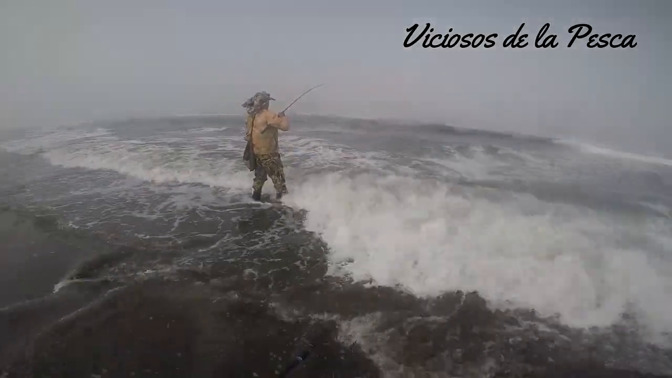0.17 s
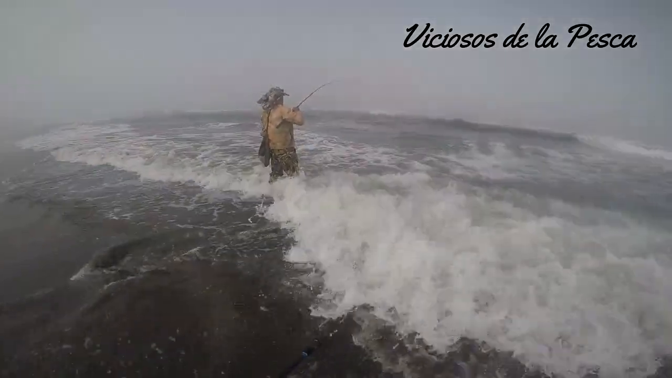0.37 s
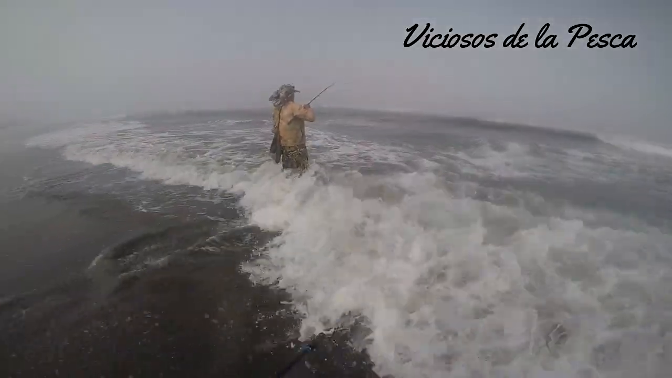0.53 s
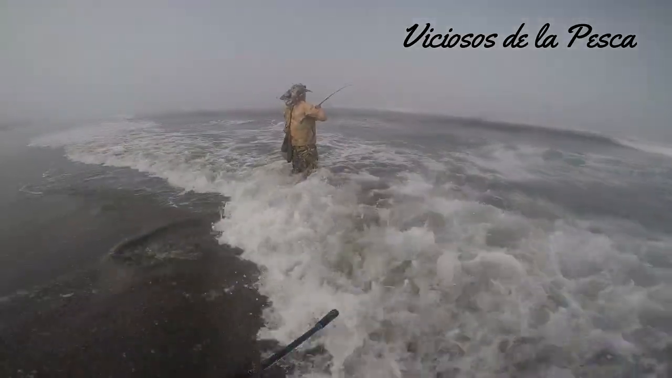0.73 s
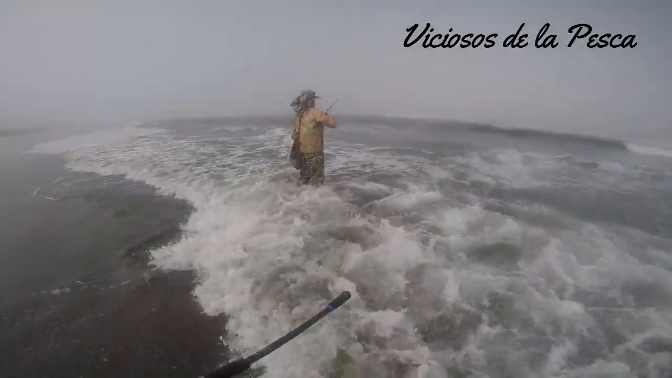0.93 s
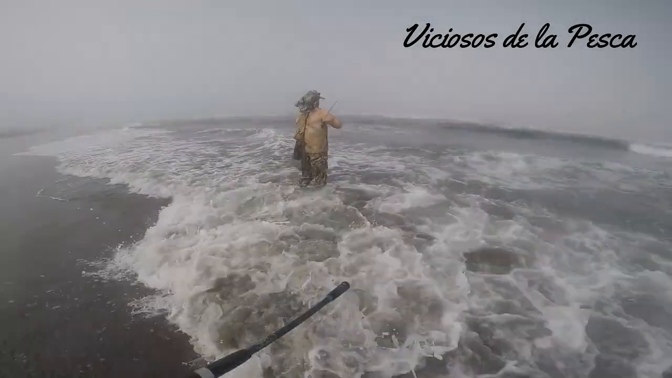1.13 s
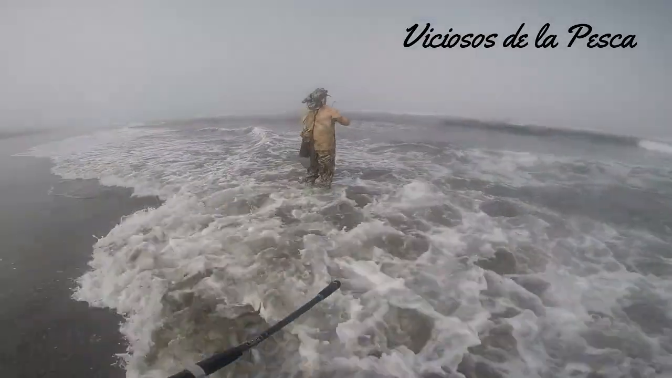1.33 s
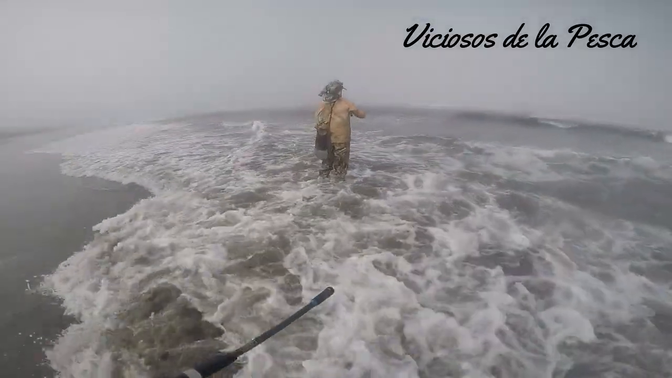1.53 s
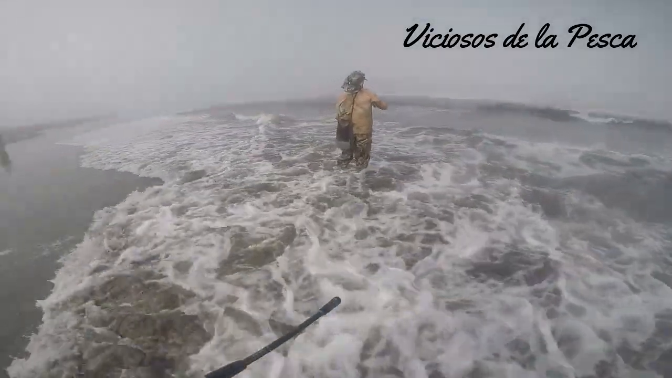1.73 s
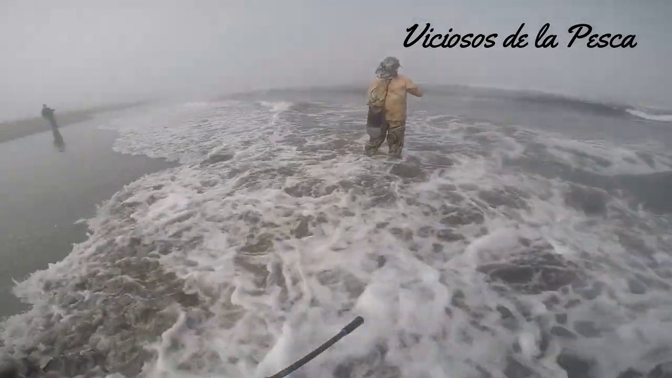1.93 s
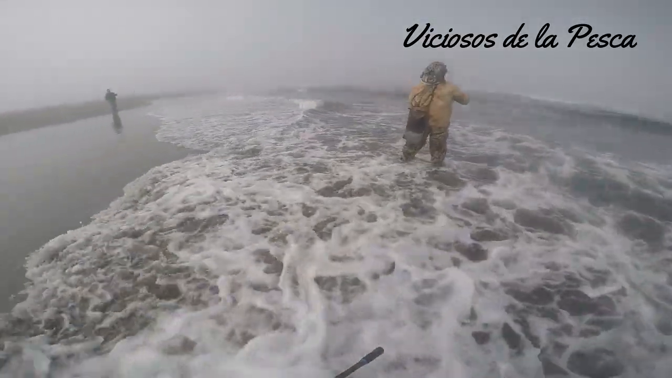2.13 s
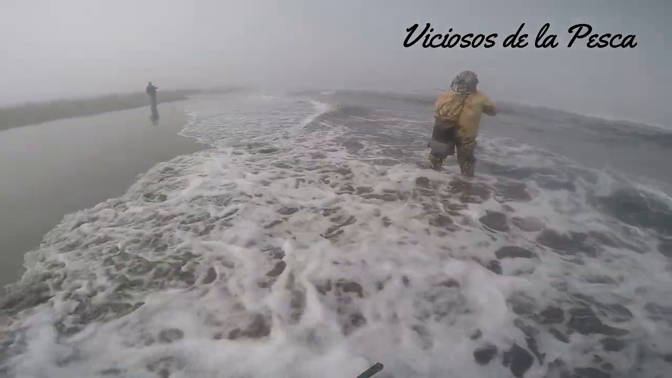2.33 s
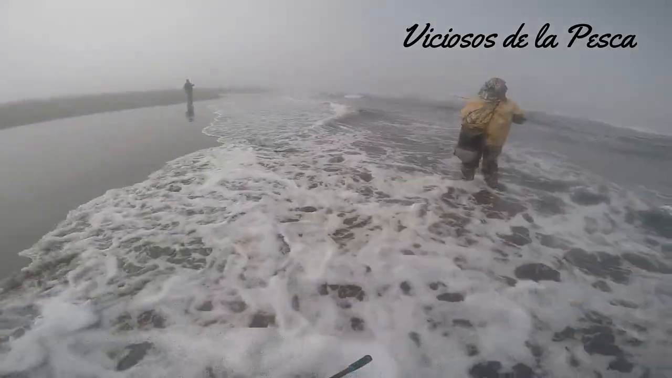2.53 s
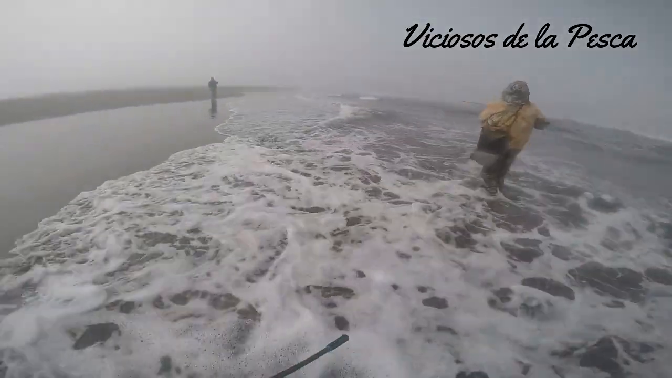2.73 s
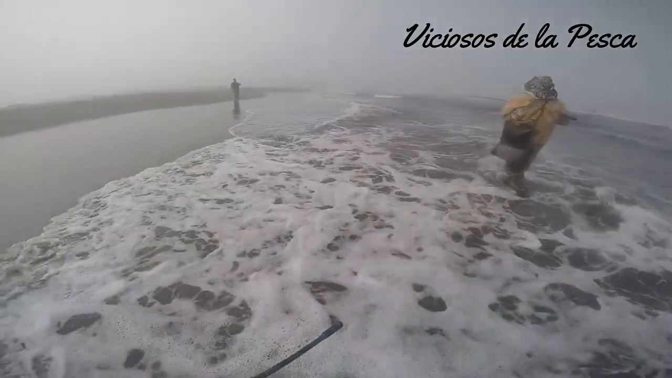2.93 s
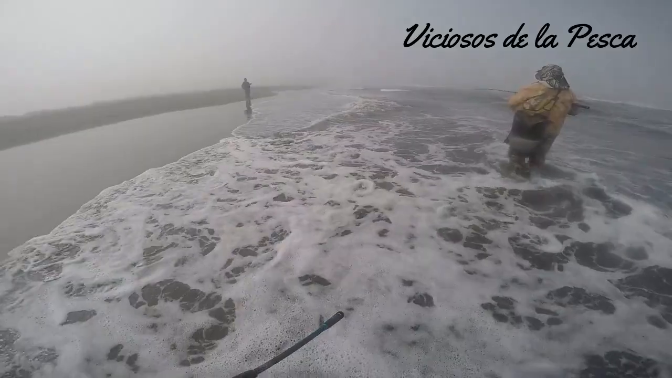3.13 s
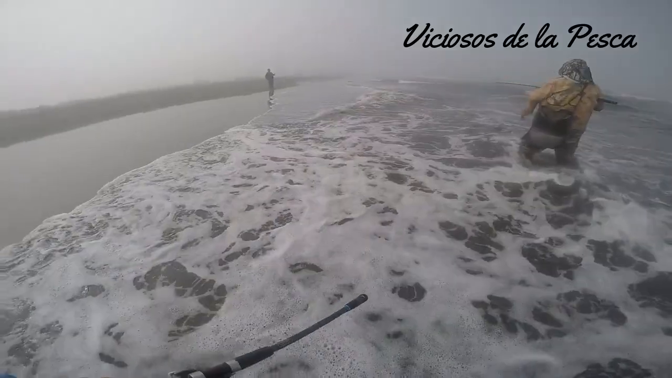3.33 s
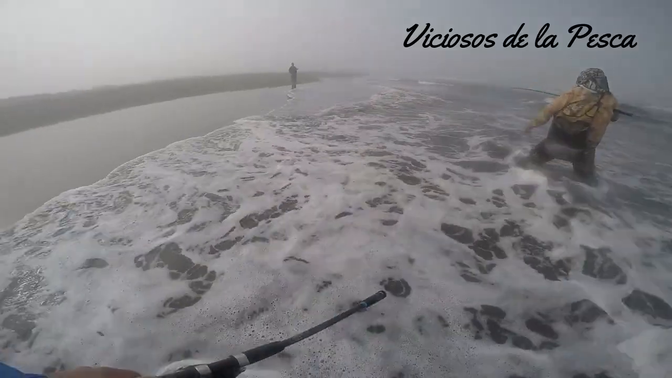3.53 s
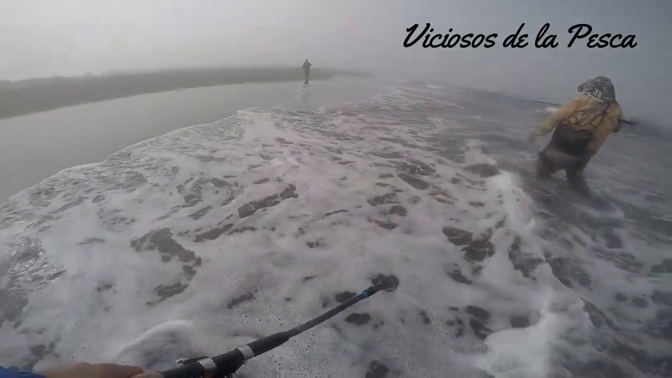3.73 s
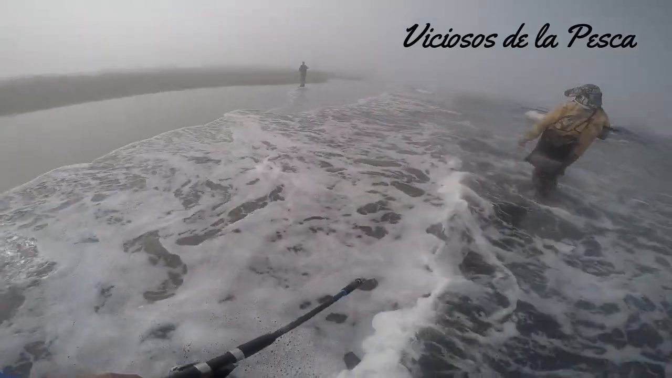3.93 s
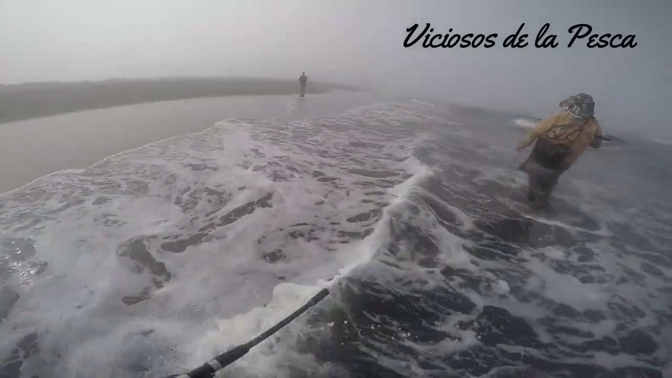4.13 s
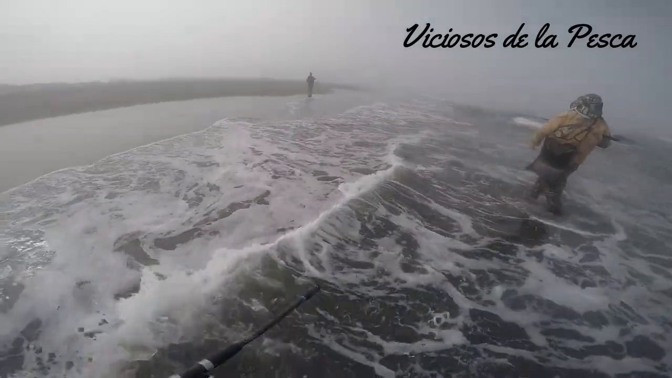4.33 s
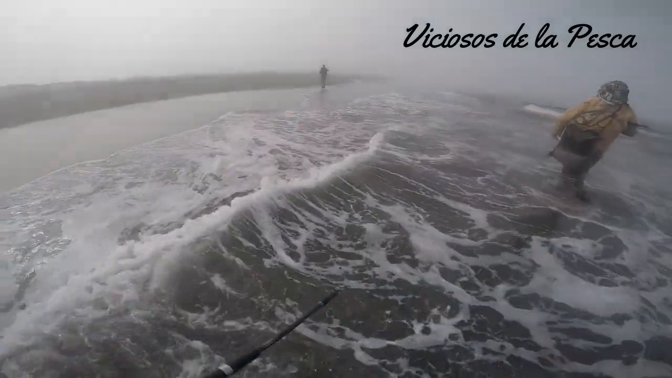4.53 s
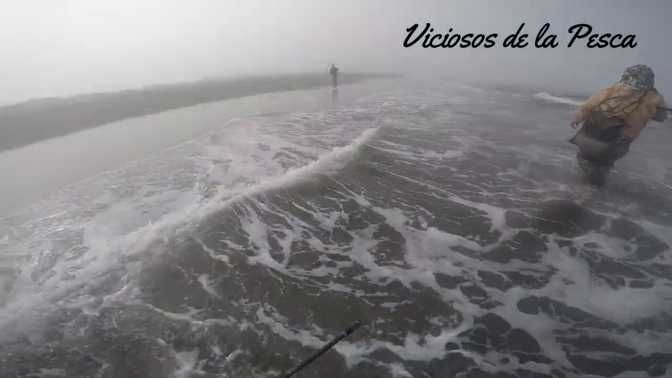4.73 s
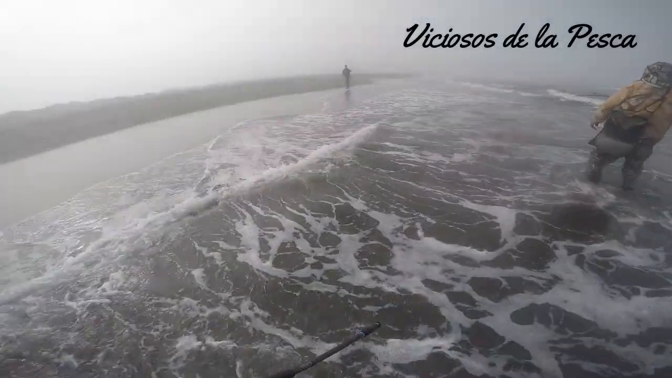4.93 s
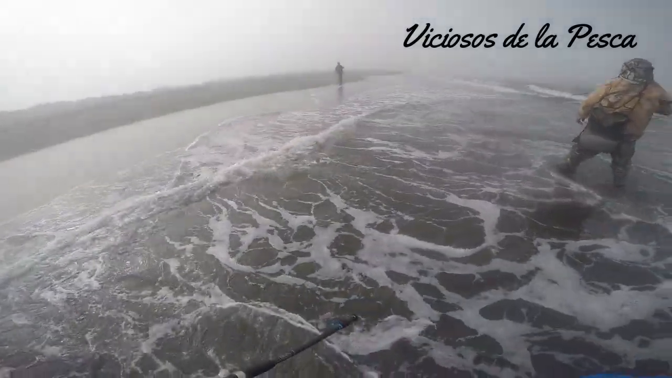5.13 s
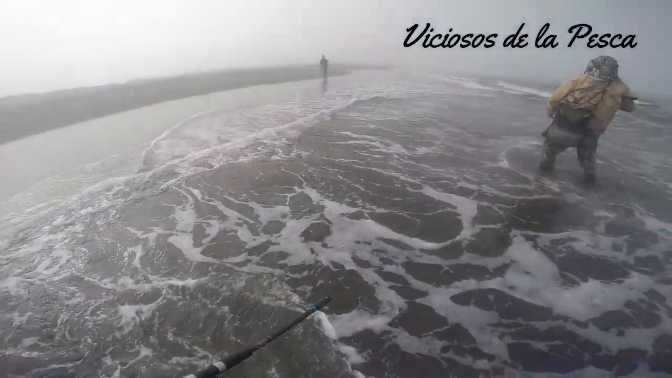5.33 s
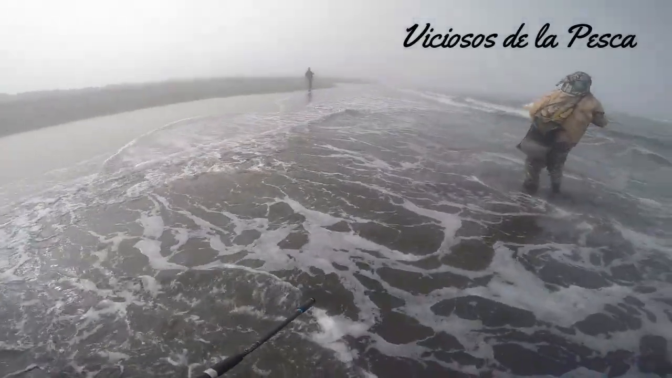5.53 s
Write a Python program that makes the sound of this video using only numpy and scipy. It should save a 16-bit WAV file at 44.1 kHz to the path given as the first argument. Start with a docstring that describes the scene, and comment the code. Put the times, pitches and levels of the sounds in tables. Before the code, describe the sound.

On an open beach, a wave is already breaking at full strength, deep roar under dense fizzing foam. It fades over about two seconds while wind thuds irregularly on the sealed microphone housing. A few drops tick in the quieter wash, then around four seconds a small second wave slaps by with spurts, crackling droplets and a short gurgle, leaving low distant surf. The sound is mono, close and slightly boxy.

```python
"""Waves on a windy beach

A wave breaks, its foam runs up the beach and thins out, and a small second wave slaps by.
Wind thuds on a sealed housing; it is slow noise that follows a list of gusts.
Far and near water is smooth noise for the roar and crowds of tiny clicks for the bubbles.
A few drops tick nearby as short rising tones, and the second wave adds spurts, crackle and a gurgle.
The cavities of the housing colour the water and the spray."""
import sys
import numpy as np
from scipy import signal
from scipy.io import wavfile
from scipy.ndimage import uniform_filter1d

SR = 44100
rng = np.random.default_rng(int(sys.argv[2]) if len(sys.argv) > 2 else 0)


def digitize_waveform(pressure):
    """Quantize a signal to 16-bit integers and store it at the path in sys.argv[1].

    Rows of a 2-D input are taken as channels; values are limited to [-1, 1].
    """
    field = np.atleast_2d(pressure).T
    bounded = np.clip(field, -1, 1)
    quanta = np.round(bounded * 32767).astype(np.int16)
    wavfile.write(sys.argv[1], SR, quanta)


N = 246288  # length in samples


def from_db(db):
    """Turn decibels into a gain."""
    return 10 ** (np.asarray(db) / 20)


def rms_one(x):
    """Scale a sound to an rms (average strength) of 1."""
    return x / np.sqrt(np.mean(x ** 2) + 1e-20)


def in_time(rows):
    """Join the rows of a table with straight lines: one curve per column, one value per sample."""
    seconds, *columns = np.transpose(rows)
    return [np.interp(np.arange(N) / SR, seconds, column) for column in columns]


def drift(rate_hz):
    """Wander at random, mostly slower than the given rate, with an rms of 1: noise smoothed twice."""
    step = 40  # samples between the points of the curve
    warm_up = 2000  # points thrown away while the smoothing settles
    pole = np.exp(-2 * np.pi * rate_hz * step / SR)
    noise = rng.standard_normal(N // step + warm_up + 2)
    slow = signal.lfilter([1], [1, -2 * pole, pole * pole], noise)[warm_up:]
    return np.interp(np.arange(N) / step, np.arange(len(slow)), rms_one(slow))


def bursts(per_s, spread_db):
    """Bubbles burst as single clicks at random moments, a few much louder than the rest."""
    loudness_db = spread_db * np.minimum(rng.exponential(1, (2, N)), 6)
    signs = rng.choice([-1, 1], (2, N))
    happens = rng.random((2, N)) < per_s / SR
    return rms_one(from_db(loudness_db) * signs * happens)


def banded(source, spectrum, shared_db, own_db, rate_hz):
    """Shape noise in third-octave bands, each swelling partly with the others and partly alone."""
    hz_points, db_points = np.transpose(spectrum)
    octaves = np.log2(hz_points[-1] / hz_points[0])
    edges = hz_points[0] * 2 ** np.arange(0, octaves + .01, 1 / 3)
    out, together = 0, drift(rate_hz)
    for k, (low, high) in enumerate(zip(edges, edges[1:])):
        band_filter = signal.butter(2, [low, high], "band", fs=SR, output="sos")
        band = signal.sosfilt(band_filter, source[k % 2])  # neighbours use different noise
        level_db = np.interp(np.log(low * high) / 2, np.log(hz_points), db_points)
        out = out + band * from_db(level_db + shared_db * together + own_db * drift(rate_hz))
    return out


def swell(peak_s, peak_db, rise_s, fade_db_per_s):
    """Power that swells up to a moment and then fades steadily."""
    t = np.arange(N) / SR - peak_s
    rise = np.exp(-(np.minimum(t, 0) / rise_s) ** 2)
    fade_db = fade_db_per_s * np.maximum(t, 0)
    return rise * from_db(2 * (peak_db - fade_db))  # doubled dB: power, not gain


# Peaks and notches made by the cavities of the housing.
# Each row: centre in Hz, width in Hz, boost (or cut, if negative) in dB.
CAVITIES = [(758, 210, -3.5), (1034, 240, 5.5), (1255, 150, 1), (1850, 110, 1.5), (2023, 280, -4.5),
            (2295, 120, -3), (2400, 140, 2), (2855, 226, -6), (3320, 1260, 6.5), (4160, 310, 6.5),
            (4950, 180, 2), (5400, 430, -0.5), (6100, 1050, 4), (5570, 140, -2.5), (6870, 220, -1.5),
            (7460, 740, 3), (11670, 1600, -6), (12500, 400, -6), (13000, 1200, -1)]


def housing(x):
    """Each cavity strengthens or weakens a narrow range of pitches: a chain of peaking filters."""
    for hz, width_hz, db in CAVITIES:
        a, w = from_db(db / 2), 2 * np.pi * hz / SR
        alpha = np.sin(w) * width_hz / hz / 2
        top = [1 + alpha * a, -2 * np.cos(w), 1 - alpha * a]
        bottom = [1 + alpha / a, -2 * np.cos(w), 1 - alpha / a]
        x = signal.lfilter(top, bottom, x)
    return x


# How hard the wind buffets the housing. Each row: time in seconds, level in dB.
GUST_LEVELS = [(0.0, -23), (0.2, -24), (0.45, -34), (0.62, -17), (0.72, -50), (0.84, -27.5), (1.01, -25.5),
               (1.23, -22.5), (1.36, -26), (1.56, -20.5), (1.8, -20), (1.85, -31.5), (2.17, -27.5),
               (2.25, -20), (2.4, -25), (2.47, -14), (2.54, -32.5), (2.6, -20), (2.78, -31), (3.1, -32),
               (3.7, -35), (4.5, -43), (4.7, -35), (5.4, -43), (5.58, -33)]
# Tone of the buffeting. Each row: frequency in Hz, relative strength in dB per Hz.
BUFFET_SPECTRUM = [(8, -12), (15, -4.5), (28, 4.5), (45, -6), (70, -16), (120, -36)]


def wind():
    """Turbulence presses on the shell: slow uneven pushes whose height follows the gusts."""
    buffet_db, = in_time(GUST_LEVELS)
    pushes = banded(rng.standard_normal((2, N)), BUFFET_SPECTRUM, shared_db=2.0, own_db=0.7, rate_hz=12.0)
    height = np.sqrt(uniform_filter1d(pushes ** 2, size=2600) + 1e-12)
    even_pushes = rms_one(pushes / height ** 1.15)  # level out chance swells before adding the gusts
    return from_db(buffet_db) * even_pushes


# The first wave breaks, runs up and thins out; its coarse roar leads, its fine foam follows.
# Each row: time in seconds, coarse swing in dB, fine swing in dB (before each layer takes its share).
FIRST_WAVE_SWINGS = [(0.0, 2, -3), (0.2, 0.5, -2.5), (0.4, -1.5, 0), (0.55, 0.5, -1), (0.7, -1, 1.5),
                     (1.02, -1.5, -1), (1.15, -4.5, -3), (1.38, -7, -7.5), (1.55, -7.5, -7),
                     (1.75, -10, -9.5), (2.2, -15, -12), (3.0, -17, -17), (3.8, -23, -21.5),
                     (5.58, -25, -27)]
# One row per layer: roar, wash, foam, fizz, hiss.
# Each row: far surf level in dB, first wave level in dB before its swings, share of the coarse swing,
# share of the fine swing, second wave peak level in dB, second wave fading in dB per second.
LAYER_LEVELS = [(-32.5, -25, 0.7, 0.041, -33.5, 2), (-46, -38, 0.84, 0.094, -49, 0),
                (-50.5, -35, 0.5, 0.58, -46.5, 0.8), (-71, -46, 0.1, 0.62, -55, 5.0),
                (-62, -49.5, 0.05, 1.05, -60, 12)]


def water_gains():
    """Far surf, first wave and second wave add up in power in every layer."""
    second_s, second_rise_s = 4.23, 0.18  # when the second wave peaks and how fast it swells
    coarse_db, fine_db = in_time(FIRST_WAVE_SWINGS)
    gains = []
    for far_db, near_db, coarse_share, fine_share, second_db, fade_db_per_s in LAYER_LEVELS:
        first_db = near_db + coarse_share * coarse_db + fine_share * fine_db
        far_power = from_db(2 * far_db)
        first_power = from_db(2 * first_db)
        second_power = swell(second_s, second_db, second_rise_s, fade_db_per_s)
        gains.append(np.sqrt(far_power + first_power + second_power))
    return gains


# Tones of the five water layers, from low to high.
# Each row: frequency in Hz, relative strength in dB per Hz.
ROAR_SPECTRUM = [(25, -19.5), (50, 1.5), (100, -0.5), (160, -4), (250, -10), (400, -18.5), (600, -27),
                 (1000, -28)]
WASH_SPECTRUM = [(400, -14), (700, -7.5), (1000, -1.5), (1500, -9), (2200, -9.5), (3200, -20)]
FOAM_SPECTRUM = [(1200, -3), (2000, -6.5), (3000, -1), (4500, -12.5), (5500, -16), (7000, -35)]
FIZZ_SPECTRUM = [(3500, -13), (5000, -9), (6500, -1.5), (8000, -13.5), (10000, -28)]
HISS_SPECTRUM = [(5500, -33), (7500, -8), (9000, -9.5), (11000, -1.5), (13500, -6), (17500, -16)]


def water():
    """A smooth noise roar lies below, with ever denser and higher bubble bursts above."""
    roar = banded(rng.standard_normal((2, N)), ROAR_SPECTRUM, shared_db=-0.2, own_db=0.28, rate_hz=11.0)
    wash = banded(bursts(per_s=15000, spread_db=2.5), WASH_SPECTRUM, shared_db=-0.83, own_db=1.3, rate_hz=6.4)
    foam = banded(bursts(per_s=20000, spread_db=3.0), FOAM_SPECTRUM, shared_db=0.5, own_db=0.55, rate_hz=23.0)
    fizz = banded(bursts(per_s=25000, spread_db=3.0), FIZZ_SPECTRUM, shared_db=0.6, own_db=1.0, rate_hz=21.0)
    hiss = banded(bursts(per_s=30000, spread_db=1.6), HISS_SPECTRUM, shared_db=0.74, own_db=0.7, rate_hz=24.0)
    layers = [rms_one(housing(layer)) for layer in (roar, wash, foam, fizz, hiss)]
    return np.sum(np.multiply(water_gains(), layers), axis=0)


# Drops and single bubbles close by.
# Each row: start in seconds, peak level in dB, starting pitch in Hz,
# ringing time in cycles of that pitch (until the fade reaches 60 dB).
DROP_EVENTS = [(2.881, -32, 1450, 14), (2.9, -35, 1060, 14), (3.1662, -38, 9900, 24),
               (3.4974, -36, 3260, 20), (3.8676, -39, 3160, 20), (3.982, -33, 1350, 23),
               (4.093, -30, 3640, 20), (4.12, -35, 3300, 22), (4.153, -41, 9200, 14),
               (4.2605, -37, 9000, 20), (4.287, -31, 3630, 22), (4.3217, -37, 9500, 14),
               (4.4254, -44, 9800, 20), (4.429, -36, 980, 11), (4.4538, -28, 8700, 21),
               (4.4535, -45, 11000, 24), (4.508, -46, 8600, 20), (4.596, -42, 10500, 16),
               (4.641, -44, 1005, 12), (4.857, -45, 9800, 14)]


def drops():
    """Each drop traps a bubble that rings briefly after a soft onset."""
    out = np.zeros(N)
    t = np.arange(int(.05 * SR)) / SR
    for start_s, peak_db, hz, cycles in DROP_EVENTS:
        onset = 1 - np.exp(-t * hz * 0.58)
        shape = onset * from_db(-60 * t * hz / cycles)
        ringing = np.sin(2 * np.pi * hz * t * (1 + 0.0018 * hz * t))  # pitch rises near the surface
        tone = from_db(peak_db) * shape / shape.max() * ringing
        at = int(start_s * SR)
        out[at:at + len(t)] += tone[:N - at]
    return out


# Slaps of the second wave. Each row: peak time in seconds, spurt level in dB, droplet crackle level in dB.
SLAP_EVENTS = [(3.875, -48.5, -62), (4.13, -41.5, -54), (4.26, -51, -61), (4.33, -45, -60), (4.4, -49, -55),
               (4.455, -43.5, -57), (4.53, -52, -54), (4.6, -61, -59)]
# Tones of the spurts, the droplets and the gurgle.
# Each row: frequency in Hz, relative strength in dB per Hz.
SPURT_SPECTRUM = [(2300, -17), (3000, 12), (3800, 3), (4500, -22), (6200, -17), (7500, -25)]
DROPLET_SPECTRUM = [(4500, -17), (7000, 4), (9000, -12), (11500, -5), (17000, -14)]
GURGLE_SPECTRUM = [(400, -20), (700, 1), (1600, -6), (2600, -5), (4000, -20)]


def spray():
    """The second wave spurts, throws droplets that crackle in clumps, then gurgles as it falls over."""
    spurts = banded(bursts(per_s=5000, spread_db=4.0), SPURT_SPECTRUM, shared_db=0.3, own_db=1.1, rate_hz=20.0)
    crackle = banded(bursts(per_s=1000, spread_db=3.0), DROPLET_SPECTRUM, shared_db=3.0, own_db=0.0, rate_hz=40.0)
    gurgle = banded(bursts(per_s=2500, spread_db=3.5), GURGLE_SPECTRUM, shared_db=0.5, own_db=0.0, rate_hz=30.0)
    slap_rise_s = 0.024
    spurt_power = sum(swell(s, db, slap_rise_s, fade_db_per_s=75) for s, db, _ in SLAP_EVENTS)
    crackle_power = sum(swell(s, db, slap_rise_s, fade_db_per_s=120) for s, _, db in SLAP_EVENTS)
    gurgle_power = swell(peak_s=4.74, peak_db=-41, rise_s=0.075, fade_db_per_s=84)
    out = np.zeros(N)
    for power, layer in ((spurt_power, spurts), (crackle_power, crackle), (gurgle_power, gurgle)):
        out += np.sqrt(power) * rms_one(housing(layer))
    return out


def scene():
    """Wind, water, drops and spray add up at one microphone."""
    return (wind() + water() + drops() + spray())[None]


def record(dry):
    """The top of the treble is cut steeply by a low-pass filter."""
    cutoff_hz, ripple_db, stop_db = 15270, .3, 70
    low_pass = signal.ellip(14, ripple_db, stop_db, cutoff_hz, fs=SR, output="sos")
    return signal.sosfilt(low_pass, dry)


dry = scene()
out = record(dry)
digitize_waveform(out)
```